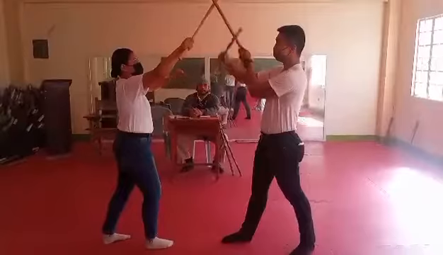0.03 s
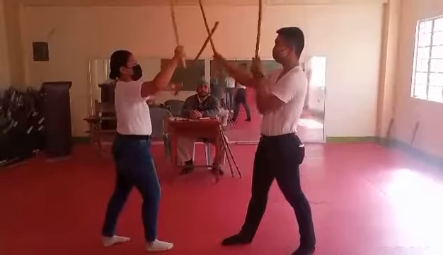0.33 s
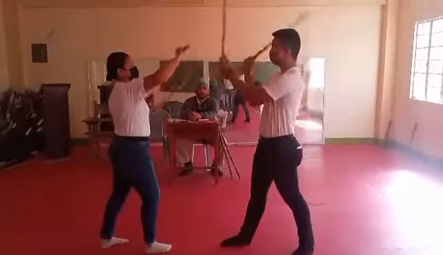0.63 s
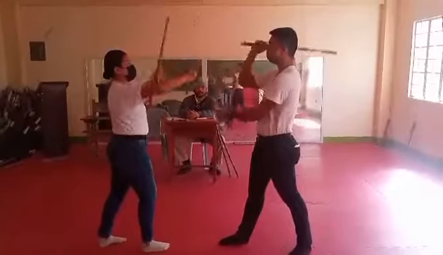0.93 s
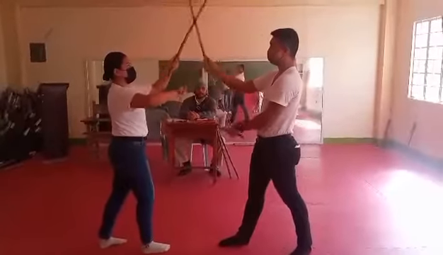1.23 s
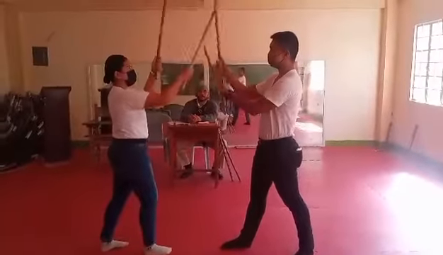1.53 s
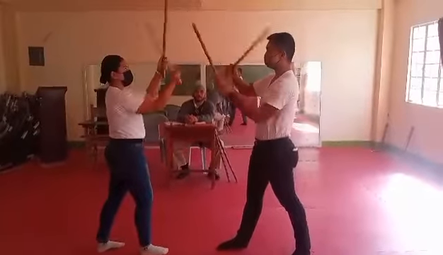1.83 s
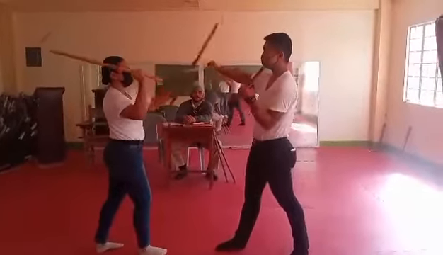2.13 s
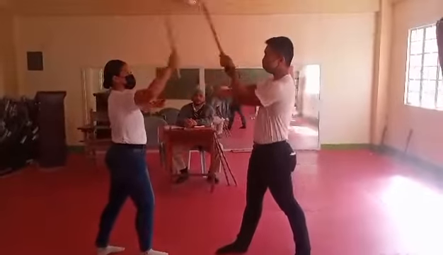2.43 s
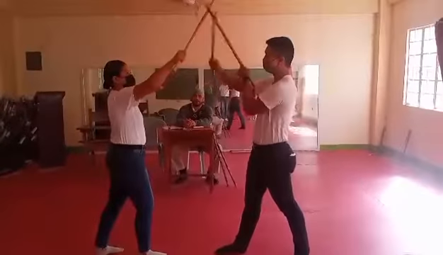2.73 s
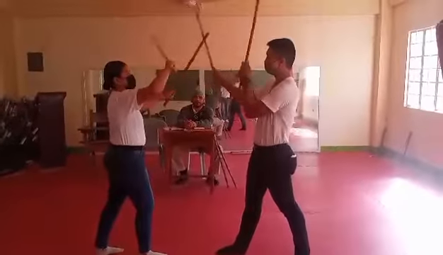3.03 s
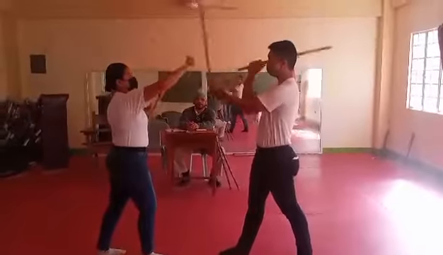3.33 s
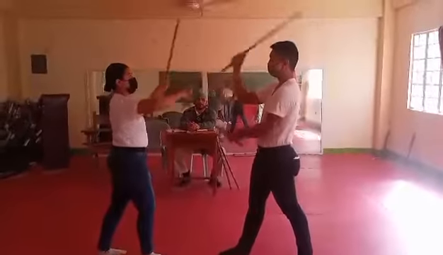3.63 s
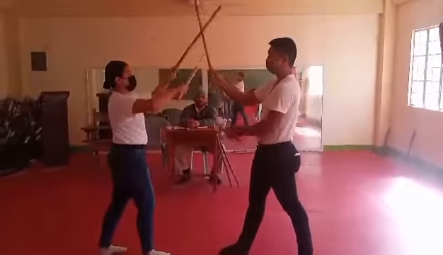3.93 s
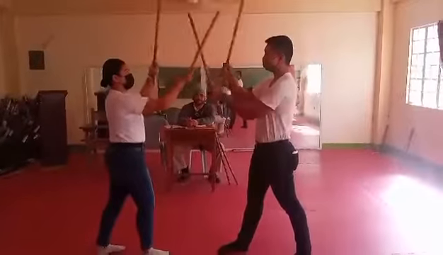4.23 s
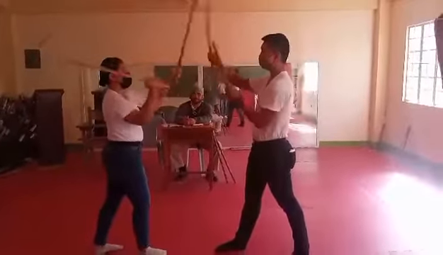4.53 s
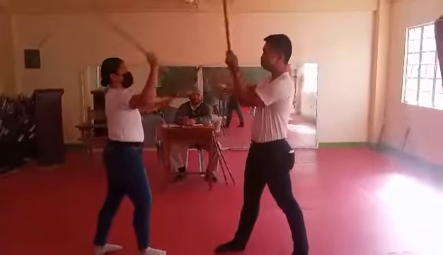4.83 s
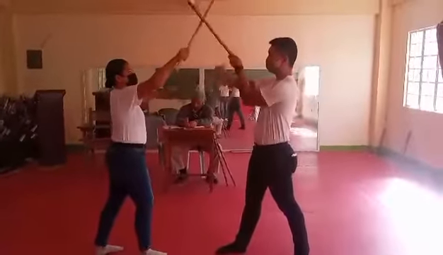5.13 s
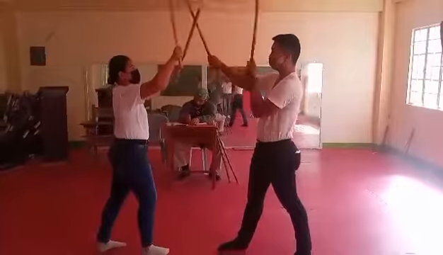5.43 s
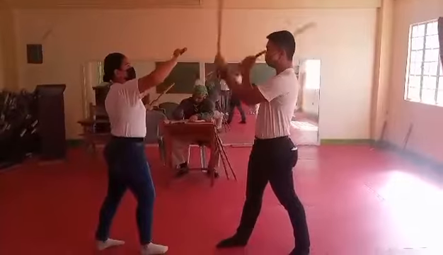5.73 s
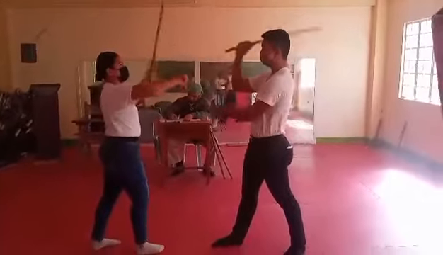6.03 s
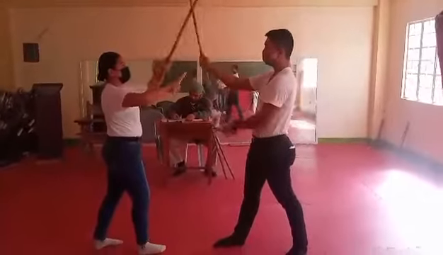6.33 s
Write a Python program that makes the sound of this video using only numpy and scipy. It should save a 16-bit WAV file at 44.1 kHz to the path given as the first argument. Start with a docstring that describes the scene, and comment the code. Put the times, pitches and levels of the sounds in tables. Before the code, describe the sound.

In a large reverberant room, wooden practice sticks clack together two or three times a second, with lighter taps between the harder hits. The blows ring briefly and fill the room over a soft, constant rush and occasional faint thuds. The single microphone ducks a little at every strike, which brings the echo forward, and a last hard crack comes with a short low thump.

```python
"""A bare, echoing hall: two people drill with a wooden stick in each hand, in a steady repeating pattern.
Each clash is a short chatter of contacts that rings the sticks and fills the hall, over a steady low rush
and a few dull thuds. A short low thump comes as the loudest clash overloads the recorder.
The mono recorder's gain control ducks at every blow and holds the start of each echo level."""
import sys
import numpy as np
from scipy import signal
from scipy.fft import rfft, irfft, next_fast_len
from scipy.io import wavfile
from scipy.ndimage import uniform_filter1d, minimum_filter1d, map_coordinates

SR = 44100
rng = np.random.default_rng(int(sys.argv[2]) if len(sys.argv) > 2 else 0)


def log_audio(samples):
    """Write samples as a 16-bit WAV file to the path given in sys.argv[1]."""
    # one column per channel
    frames = np.atleast_2d(samples).T
    # limit to full scale, then quantise
    limited = np.clip(frames, -1, 1)
    pcm = np.round(limited * 32767).astype(np.int16)
    wavfile.write(sys.argv[1], SR, pcm)


N = 289737


def amp(db):
    """Decibels to gain."""
    return 10 ** (np.asarray(db) / 20)


def unit(x):
    """Scale to rms 1."""
    return x / np.sqrt(np.mean(x ** 2) + 1e-20)


def along(points, hz):
    """Interpolate (frequency [Hz], value) points on a log axis."""
    knots_hz, values = np.transpose(points)
    return np.interp(np.log(hz + 1), np.log(knots_hz + 1), values)


def filtered(x, response):
    """Zero-phase filter with gain response(hz)."""
    size = next_fast_len(len(x) + SR // 4)
    hz = np.fft.rfftfreq(size, 1 / SR)
    return irfft(rfft(x, size) * response(hz), size)[:len(x)]


def causal(gain):
    """Minimum-phase impulse response of this spectral shape, energy 1."""
    cepstrum = irfft(np.log(np.maximum(gain, 1e-6)))
    half = len(cepstrum) // 2
    cepstrum[1:half] *= 2
    cepstrum[half + 1:] = 0
    response = irfft(np.exp(rfft(cepstrum)))
    return response / np.linalg.norm(response)


def add(track, at_s, sound):
    """Mix a sound into the track, cropped at both ends."""
    start = round(at_s * SR)
    sound = sound[max(-start, 0):]
    span = track[max(start, 0):][:len(sound)]
    span += sound[:len(span)]


def resonance(hz, centre_hz, half_width_hz):
    """Gain of one resonance, with steep skirts."""
    return 1 / (1 + ((hz - centre_hz) / half_width_hz) ** 2)


def rush(level_db=-37, waver_db=0.5, waver_hz=5):
    """The hall's steady background noise, wavering slightly."""
    # (frequency [Hz], spectral density [dB])
    spectrum = [(20, -36), (36, -35), (52, -14), (70, -6.5), (95, -15), (130, -0.5), (240, 1), (320, 7.5),
                (450, 1.5), (650, 3), (1200, 1.5), (3000, 4), (7000, -23), (14000, -42)]
    knots = rng.standard_normal(int(N / SR * waver_hz) + 4)
    waver = map_coordinates(knots, [np.arange(N) * waver_hz / SR])
    noise = unit(filtered(rng.standard_normal(N), lambda hz: amp(along(spectrum, hz))))
    return amp(level_db + waver_db * waver) * noise


def thuds_and_overload_thump():
    """Decaying bass noise: dull thuds, then a short thump as the loudest clash overloads the recorder."""
    # (time [s], level [dB], centre [Hz], t60 [s]); last row: the overload thump
    bass_bursts = [(.53, -44, 60, 0.36), (1.9, -54, 52, .6), (3.08, -43, 52, 0.51), (4.451, -52, 55, 0.49),
                   (5.719, -43, 160, 0.94), (6.343, -16, 110, 0.026)]
    track = np.zeros(N)
    t = np.arange(SR // 2) / SR
    for at_s, level_db, centre_hz, t60_s in bass_bursts:
        noise = rng.standard_normal(len(t))
        rumble = unit(filtered(noise, lambda hz: resonance(hz, centre_hz, 0.37 * centre_hz)))
        envelope = amp(level_db - 60 * t / t60_s) * (1 - np.exp(-20 * t / t60_s))
        add(track, at_s, envelope * rumble)
    return track


def hall_tail(build_s=0.025):
    """Diffuse echo: builds up as reflections multiply; the treble dies first."""
    # (frequency [Hz], t60 [s])
    decay_times = [(200, 1.48), (1000, 1.066), (2200, 1.297), (4000, 1.177), (6500, 1.016), (10000, 0.9),
                   (14000, 0.52)]
    hz, t, noise_stft = signal.stft(rng.standard_normal(2 * SR), SR, nperseg=256)
    decay = amp(-60 * t / along(decay_times, hz)[:, None])
    _, tail = signal.istft(noise_stft * decay, SR, nperseg=256)
    return tail * (1 - np.exp(-np.arange(len(tail)) / SR / build_s))


def chatter(snap_t60_s=0.0055, ping_hz=2240, ping_db=-12, ping_decay_s=0.0044, size=1024):
    """The shafts snap together three times within a few milliseconds, over one short ping."""
    # (delay [s], level [dB])
    contacts = [(0, -1.5), (.0017, -1), (.0038, 6.5)]
    t = np.arange(size) / SR
    force = np.zeros(size)
    for delay_s, level_db in contacts:
        snap = rng.standard_normal(size) * amp(-60 * t / snap_t60_s)
        add(force, delay_s * rng.uniform(0.93, 1.15), amp(level_db + rng.normal()) * snap)
    ping = t * amp(-60 * t / ping_decay_s) * np.sin(2 * np.pi * ping_hz * t)
    return force / np.linalg.norm(force) + amp(ping_db) * ping / np.linalg.norm(ping)


def stick_ring(knock_db, treble_db, rebound_s, rings, scatter_db=2.5, detune=0.019, rebound_gain=0.18):
    """The sticks' impulse response: bending modes over a broad crack of wood on wood."""
    # (frequency [Hz], half width [Hz], level [dB])
    bending_modes = [(598, 6.7, -5.5), (889, 43, -5.5), (1344, 315, -4.5), (1835, 163, -4.5),
                     (2160, 47, -7), (2490, 580, -5.5), (3640, 450, -4.5), (4410, 170, -5),
                     (5370, 120, -23), (6310, 130, -7), (8910, 1660, -15.5)]
    # (frequency [Hz], spectral density [dB])
    crack_spectrum = [(60, -83), (300, -18.5), (1050, -12), (1900, 0.5), (4000, -0.5), (6550, -2),
                      (7000, -6), (7800, -12), (10000, -19.5), (11500, -38), (14000, -34)]
    hz = np.fft.rfftfreq(4096, 1 / SR)
    power = amp(along(crack_spectrum, hz)) ** 2
    for mode_hz, half_width_hz, level_db in bending_modes:
        gain = amp(level_db + scatter_db * rng.normal())
        centre_hz = mode_hz * (1 + detune * rng.normal())
        power += (gain * resonance(hz, centre_hz, half_width_hz)) ** 2
    colour_db = along([(1100, knock_db), (2000, 0), (2800, 0), (6000, treble_db)], hz)
    for ring_hz, lift_db in rings:
        colour_db += lift_db * resonance(hz, ring_hz, 0.048 * ring_hz)
    # a weaker second touch combs the spectrum: a hollow pitch
    comb = np.abs(1 + rebound_gain * np.exp(-2j * np.pi * hz * rebound_s))
    return causal(np.sqrt(power) * amp(colour_db) * comb)


def stick_clashes(direct_boost_db=20, second_lift_db=3):
    """Each clash arrives directly, off the floor and nearest walls, and as the hall's long echo."""
    # (time [s], force [dB], low knock [dB], treble [dB], direct crack [dB], rebound [s],
    #  main ring [Hz], its lift [dB], second ring [Hz])
    clashes = [ (-0.045, -10, -4.5, -1, 7, .00143, 3980, 4.5, 2516),
               (0.2480, -12.5, -3.5, -5, 3, .00168, 2300, 2, 1460),
               (0.3006, -15.5, -7, 0.5, 8.5, .0005, 3900, 7, 2320),
               (0.8316, -9, -0.5, 0, 4, .00143, 1922, 6.5, 4300),
               (1.282, -8.5, -5, 2, 3.5, .0015, 1320, 7.5, 2870),
               (1.5651, -8.5, -5, -2, 1, .00106, 2950, 3.5, 5400),
               (2.1466, -8.5, -1.5, -4.5, 3.5, .00158, 2130, 3, 3140),
               (2.5880, -8, -1, -1, 0.5, .00325, 2110, 5.5, 6700),
               (2.8766, -13, 3.5, -4.5, -3, .00065, 2046, 7.5, 2430),
               (3.114, -29, 8, 1, 6.5, .0017, 2046, -4, 2660),
               (3.4668, -9.5, -1.5, -1, 4.5, .00335, 3670, 3.5, 2110),
               (3.8907, -5.7, -5.5, 3, 5.5, .00158, 4260, 3, 3340),
               (4.1599, -17.5, 0.5, -0.5, 5, .00112, 3070, 7, 924),
               (4.2610, -19, -2.5, -2, 5, .00193, 3140, 1, 2010),
               (4.6572, -8.5, -1, -2, 3, .00122, 3540, 5, 2330),
               (5.0830, -11, -1, -1, 2.5, .00239, 2160, 4.5, 3320),
               (5.3369, -20, 1, -0.5, 4, .00085, 2350, 5, 1760),
               (5.4427, -13.5, -3, -1.5, 0, .00086, 3160, 5, 1570),
               (5.9239, -8, -3, -1.5, 2.5, .00095, 2050, 0.5, 3600),
               (6.3434, -6.5, -5.5, 6.3, 6, .00074, 5600, 8.5, 4270), ]
    # bright tick beamed along the direct path: (frequency [Hz], gain [dB])
    beam = [(2200, 1.5), (3300, -1), (5700, 6.5), (8500, 2.5)]
    # (delay [s], level re direct [dB])
    early_echoes = [(.006, -9), (.012, -7), (.033, -17), (0.048, -15), (.077, -8)]
    track = np.zeros(N)
    for at_s, force_db, knock_db, treble_db, crack_db, rebound_s, main_hz, lift_db, second_hz in clashes:
        direct = amp(crack_db + direct_boost_db) * filtered(chatter(), lambda hz: amp(along(beam, hz)))
        paths = hall_tail()
        add(paths, 0, direct)
        for delay_s, echo_db in early_echoes:
            add(paths, delay_s * rng.uniform(0.74, 1.08), amp(echo_db) * direct)
        rings = [(main_hz, lift_db), (second_hz, second_lift_db)]  # favoured by grip and striking point
        wood = stick_ring(knock_db, treble_db, rebound_s, rings)
        add(track, at_s, amp(force_db) * signal.fftconvolve(paths, wood))
    return track


def scene():
    """One microphone feeds both channels."""
    mono = stick_clashes() + thuds_and_overload_thump() + rush()
    return np.array([mono, mono])


def gain_control(x, threshold_db=-21.5, slope=0.79, headroom_db=7, ahead_s=0.0082, release_s=0.038):
    """Ducks just ahead of anything loud or sharp, then recovers; less sensitive to treble."""
    sensed = filtered(x, lambda hz: amp(along([(3500, 0), (5800, -3)], hz)))

    def level_db(window_s):
        power = uniform_filter1d(sensed ** 2, int(window_s * SR))
        return 10 * np.log10(np.abs(power) + 1e-12)

    over_db = np.maximum(level_db(window_s=0.014), level_db(window_s=0.0057) - headroom_db) - threshold_db
    cut_db = np.maximum(slope * over_db, 1e-3)
    # each cut fades exponentially until a deeper one takes over
    age = np.arange(N) / SR / release_s
    cut_db = np.exp(np.maximum.accumulate(np.log(cut_db) + age) - age)
    ahead = int(ahead_s * SR)
    cut_db = -minimum_filter1d(-cut_db, ahead, origin=-(ahead // 2))
    return x * amp(-uniform_filter1d(cut_db, ahead))


def record(dry, ceiling=0.76, low_hz=32, top_hz=14200):
    """Gain control, soft clipping of the sharpest peaks, band limits."""
    x = gain_control(dry[0])
    x = x / (1 + (x / ceiling) ** 6) ** (1 / 6)
    x = filtered(x, lambda hz: (hz < top_hz) * hz ** 4 / (hz ** 4 + low_hz ** 4))
    return np.array([x, x])


dry = scene()
out = record(dry)
log_audio(out)
```